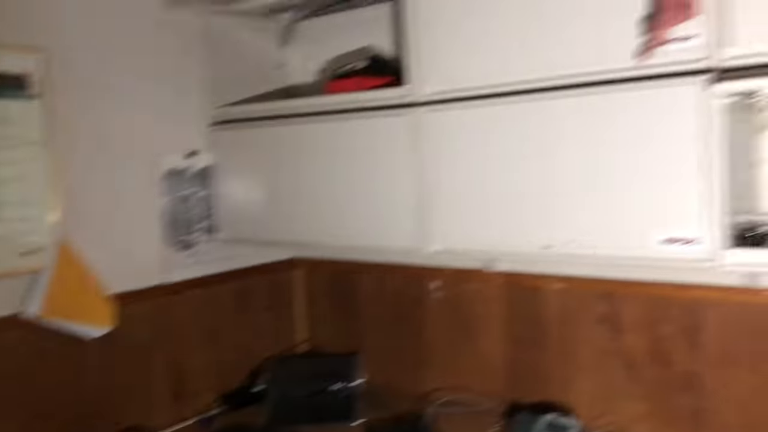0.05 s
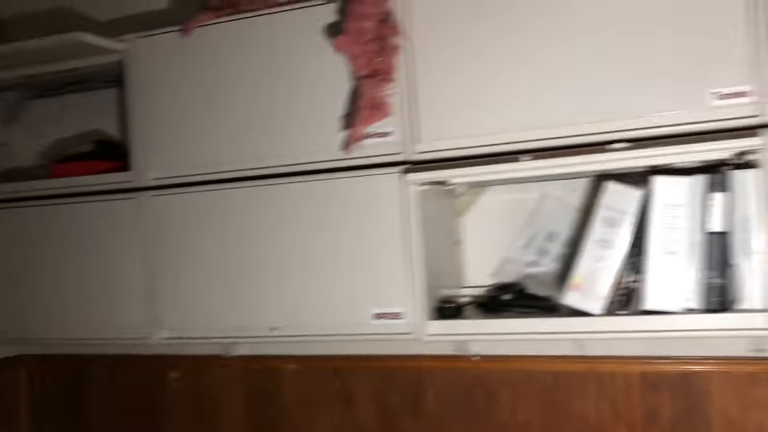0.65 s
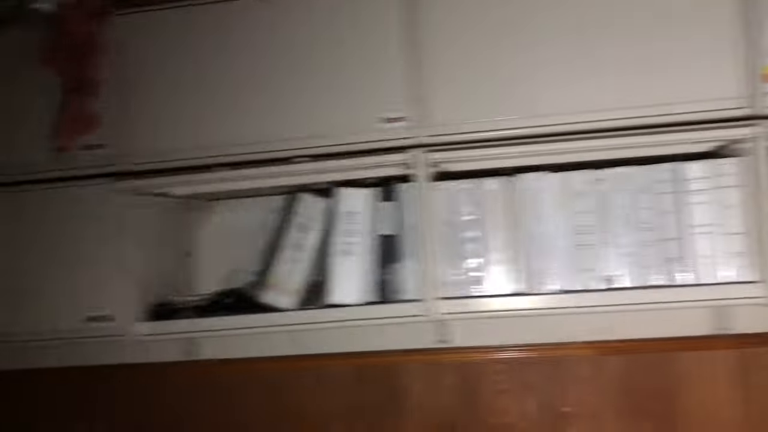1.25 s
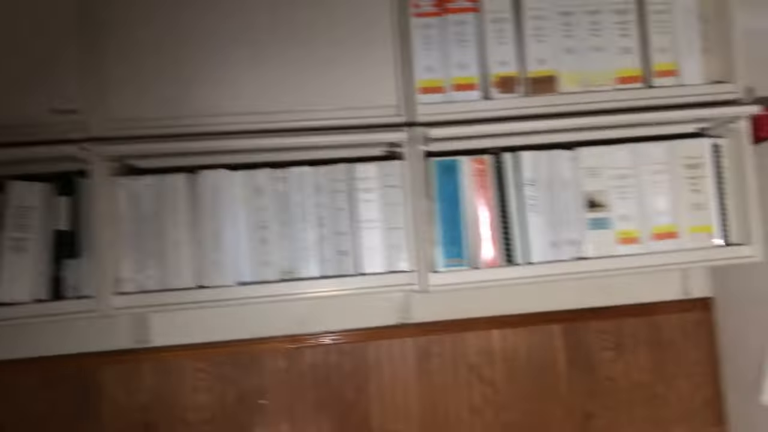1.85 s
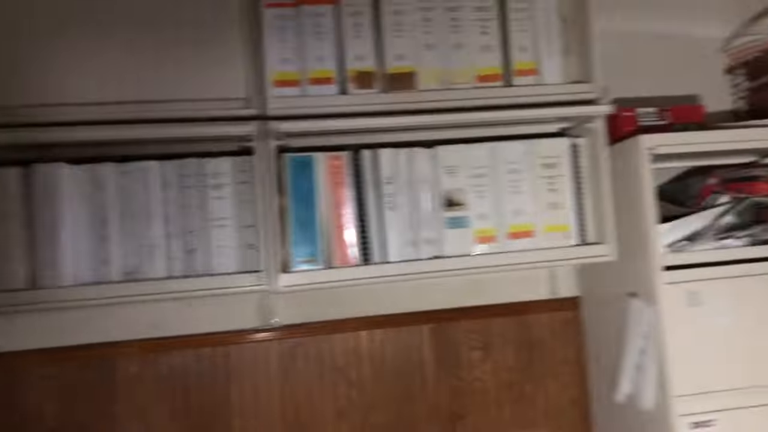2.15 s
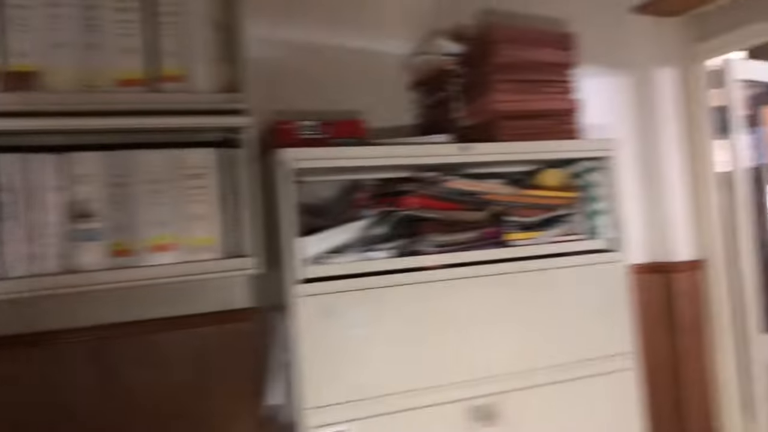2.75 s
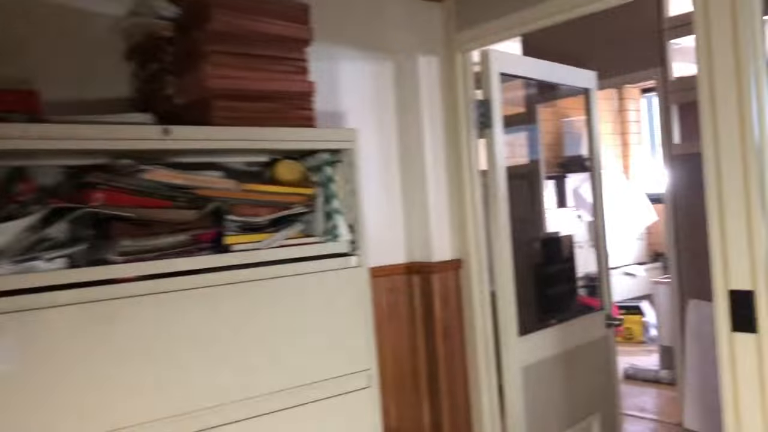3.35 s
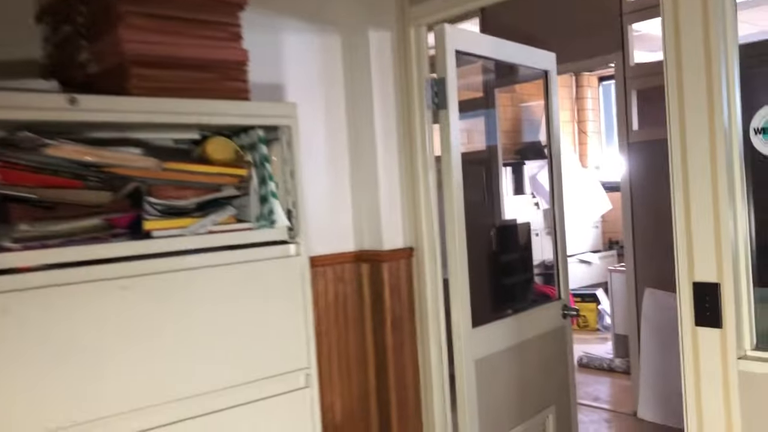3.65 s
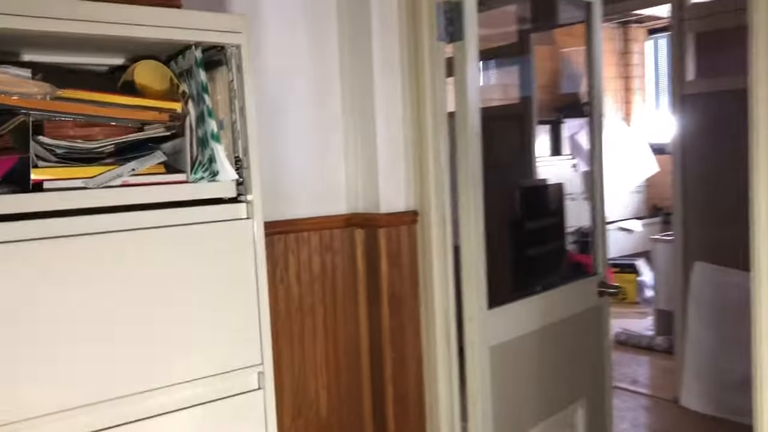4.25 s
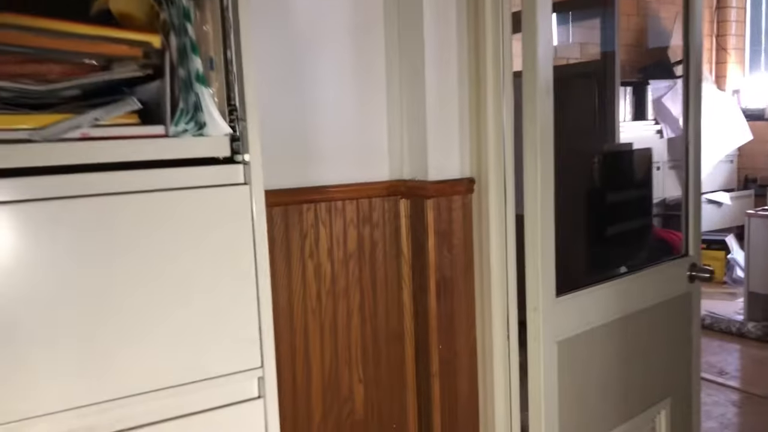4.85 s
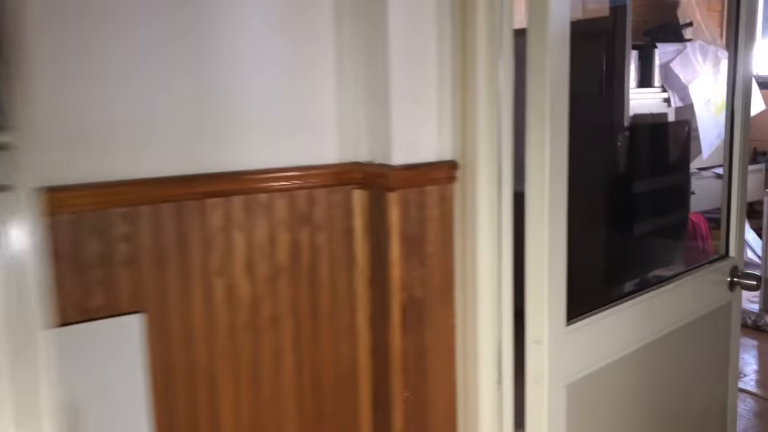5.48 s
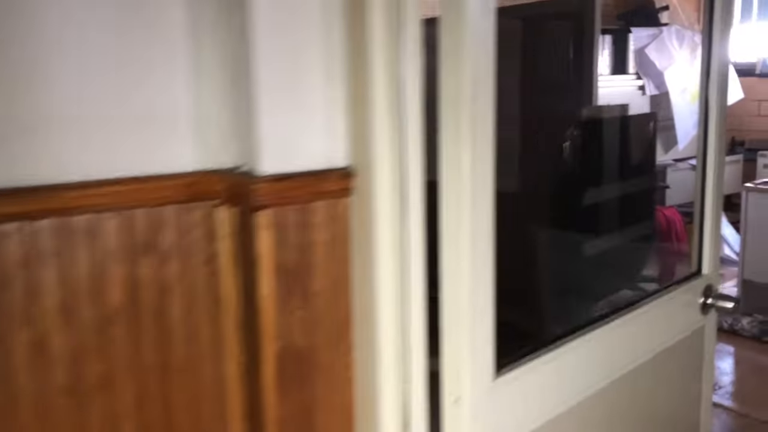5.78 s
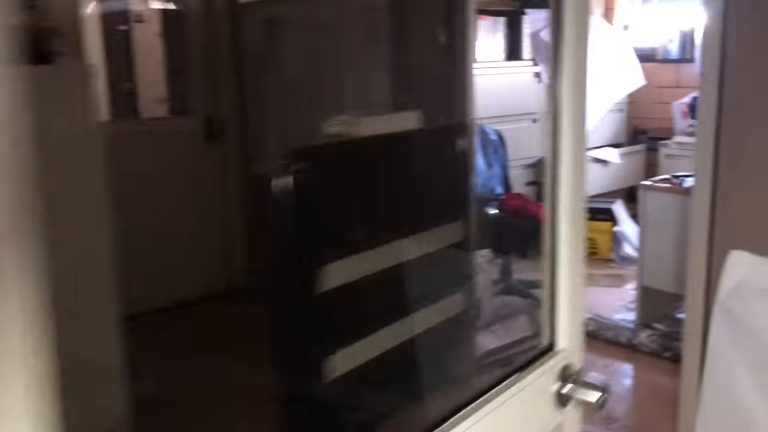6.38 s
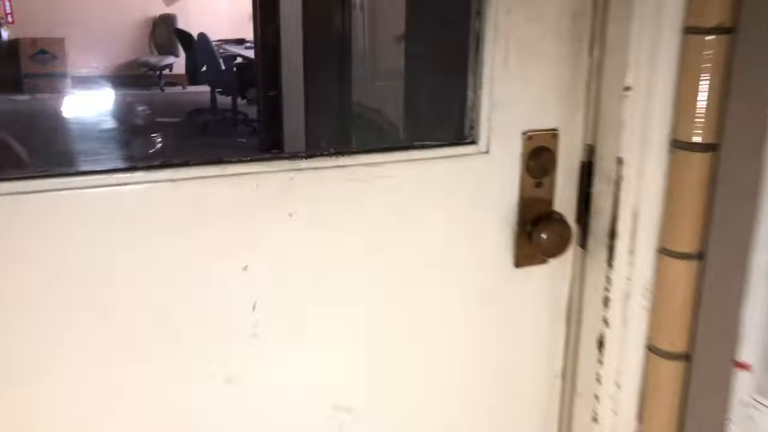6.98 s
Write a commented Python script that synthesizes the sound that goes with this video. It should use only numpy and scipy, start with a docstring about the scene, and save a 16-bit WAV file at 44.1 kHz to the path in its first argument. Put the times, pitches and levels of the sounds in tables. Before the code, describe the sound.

Faint footsteps on wooden boards lead into a loud knock and the brief clatter of a metal sheet. The walker carries on unevenly, scraping over grit and snapping small bits of debris, with a cluster of heavy steps, one more firm thud and then lighter knocks. The quiet, furnished office echoes briefly, while soft cloth rustle and hand rumble sit right at the microphone.

```python
"""A cluttered office: someone walks slowly through it, phone in hand. Shoes knock the floorboards into
shaking and scuff over grit. A loose metal sheet clanks and rocks to rest, brittle litter snaps underfoot,
and soles and small fittings squeak as they rub. All this echoes briefly in the furnished room.
Close to the microphone, clothes rustle and the hand rumbles on the phone; the building is very quiet."""
import sys
import numpy as np
from scipy import signal
from scipy.fft import rfft, irfft
from scipy.io import wavfile
from scipy.ndimage import uniform_filter1d

SR = 44100
rng = np.random.default_rng(int(sys.argv[2]) if len(sys.argv) > 2 else 0)


def store_wav(level_fs):
    """Save 16-bit WAV to argv[1]."""
    pcm = np.round(np.clip(np.atleast_2d(level_fs), -1, 1) * 32767)
    wavfile.write(sys.argv[1], SR, pcm.T.astype(np.int16))


N = 318402
TIME = np.arange(N) / SR
FREQ = np.maximum(np.arange(2049) * SR / 4096, 1)  # every filter curve has one gain for each of these Hz

# The tones at which light, hard litter rings. Each row: pitch in Hz, width in Hz, strength in dB.
LITTER_TONES = [(910, 200, 12), (1380, 74, 10), (1720, 270, 7), (2290, 170, 5.5), (3770, 410, 5),
                (4560, 250, 2), (6800, 220, -11)]


def undb(db):
    """Turn decibels into a number to multiply by."""
    return 10 ** (np.asarray(db) / 20)


def add(out, start, sound):
    """Mix a sound into out, from a start time in seconds."""
    i = int(start * SR)
    out[i:i + len(sound)] += sound[:N - i]


def fade(t, fade_s):
    """A dying away that falls by 60 dB in fade_s seconds, the fade time."""
    return np.exp(-np.log(1000) * t / fade_s)


def wander(per_second, count):
    """A smooth random drift, mostly between -1 and 1."""
    hold = max(int(SR / per_second), 1)
    stairs = np.repeat(rng.standard_normal(count // hold + 1), hold)
    return uniform_filter1d(stairs, hold)[:count]


def grains(count, spread_db):
    """Many tiny contacts of unequal size make a rough noise, scaled to a power of 1."""
    noise = rng.standard_normal(count) * undb(spread_db * wander(2500, count))
    return noise / np.sqrt(np.mean(noise ** 2))


def ring(sound, curve):
    """Filter a sound by the shape of a curve; white noise keeps its power."""
    cepstrum = irfft(np.log(curve / curve.max() + 1e-5))
    half = len(cepstrum) // 2
    # folding onto the first half makes the ringing come after a hit, never before it
    cepstrum[1:half] *= 2
    cepstrum[half + 1:] = 0
    response = irfft(np.exp(rfft(cepstrum)))
    return signal.fftconvolve(sound, response / np.linalg.norm(response))


def band(low_hz, high_hz, slope):
    """A filter curve that passes sound between two edges; more slope means less treble."""
    return 1 / np.sqrt((1 + (low_hz / FREQ) ** 5) * (1 + (FREQ / high_hz) ** (2 * slope)))


def colour(points):
    """A filter curve drawn through (Hz, dB) points."""
    hz, db = np.transpose(points)
    return undb(np.interp(np.log(FREQ), np.log(hz), db))


def body(tones, patchy_db):
    """The filter curve of a struck thing: its main tones, plus ripples that differ from spot to spot."""
    peaks = sum(undb(db) ** 2 / (1 + (2 * (FREQ - hz) / width) ** 2) for hz, width, db in tones)
    ripples = np.interp(np.sqrt(FREQ), np.linspace(0, np.sqrt(SR / 2), 130), rng.standard_normal(130))
    return np.sqrt(1 + peaks) * undb(patchy_db * ripples * np.minimum(FREQ / 700, 1))


def building():
    """The air of the empty building makes a faint, steady noise."""
    # The tone of the air. Each row: frequency in Hz, relative level in dB.
    air_tone = [(18, -28), (30, -19), (55, -8), (110, -2.5), (230, -6.5), (430, -3.5), (800, -15),
                (2000, -26), (6000, -26), (15500, -27)]
    return undb(-72) * ring(rng.standard_normal(N), colour(air_tone))[:N]


def room(sound, echo_db):
    """Cabinets and walls scatter a sound, adding a short echo to it."""
    # How long the echo lasts. Each row: frequency in Hz, fade time in seconds.
    echo_times = [(125, 0.29), (500, 0.22), (2000, 0.33), (6000, 0.25), (14000, 0.28)]
    hz, fade_times = np.transpose(echo_times)
    t = TIME[:SR * 3 // 4]
    octave = np.log2(np.maximum(np.linspace(0, SR / 2, len(t) // 2 + 1), 1))
    scatter = rfft(rng.standard_normal(len(t)))
    echo = np.zeros(len(t))
    for one_band, fade_s in zip(np.eye(len(hz)), fade_times):
        share = np.interp(octave, np.log2(hz), one_band)
        echo += irfft(scatter * share, len(t)) * fade(t, fade_s)
    echo *= np.clip((t - 0.004) / 0.004, 0, 1)  # the first bounce takes 4 ms to arrive
    return sound + undb(echo_db) * signal.fftconvolve(sound, echo / np.linalg.norm(echo))[:N]


def clothes_and_hand():
    """Cloth folds and rubs in small uneven surges; the hand rumbles on the phone as the body moves."""
    # The walker's movement. Each row: time in seconds, then base levels in dB of rustle, hiss and rumble.
    movement = [(0.0, -72, -83, -80.5), (1.03, -73, -80.5, -78.5), (1.24, -66, -76.5, -69),
                (1.81, -59, -71, -78), (1.97, -49.5, -53.5, -75), (2.15, -53, -61.5, -73),
                (2.33, -69.5, -73.5, -76), (3.08, -59, -69, -73.5), (3.76, -59.5, -70.5, -79),
                (4.0, -59, -63, -74), (4.32, -60.5, -72.5, -77), (4.66, -62, -67, -74),
                (4.93, -55, -65, -70), (5.13, -61.5, -69.5, -68.5), (5.45, -68.5, -71, -72),
                (5.89, -56.5, -64.5, -68), (6.86, -67, -72.5, -70), (7.22, -56, -64.5, -67.5)]
    # The tones of cloth rustle, cloth hiss and hand rumble. Each row: frequency in Hz, relative dB.
    rustle_tone = [(60, -33.5), (130, 2.5), (300, 2), (550, -3), (1000, -7.5), (2000, -15), (4000, -40),
                   (12000, -34.5)]
    hiss_tone = [(500, -6), (1500, 6), (3500, 4), (7000, -2), (15000, -10)]
    rumble_tone = [(18, -18), (35, -3.5), (52, 1.5), (90, -1.5), (150, -14.5), (400, -42.5)]
    times, *levels = np.transpose(movement)
    rustle_db, hiss_db, rumble_db = (np.interp(TIME, times, level) for level in levels)
    folds = wander(28, N)
    rustle = ring(grains(N, spread_db=4) * undb(rustle_db + 1.4 * folds), colour(rustle_tone))
    hiss = ring(grains(N, spread_db=2) * undb(hiss_db + 0.42 * folds + 2), colour(hiss_tone))
    rumble = ring(rng.standard_normal(N) * undb(rumble_db + 3), colour(rumble_tone))
    return (rustle + hiss + rumble)[:N]


def squeaks():
    """A brief rub wakes one thin, high tone and a weaker one above it."""
    # Soles and small fittings rubbing. Each row: start in seconds, level in dB, pitch in Hz, width in Hz.
    rubs = [(2.479, -49, 1800, 350), (3.272, -48.5, 8070, 130), (4.156, -62, 10900, 900),
            (4.976, -65, 8300, 150), (5.874, -67, 11000, 700), (6.574, -55, 10700, 900)]
    out, count = np.zeros(N), int(0.052 * SR)
    swell = np.interp(np.linspace(0, 1, count), [0, 0.08, 1], [0, 1, 0.1])
    for start, db, hz, width_hz in rubs:
        rub = rng.standard_normal(count) * swell
        tone, overtone = (1 / (1 + (2 * (FREQ - centre) / width_hz) ** 2) for centre in (hz, hz * 1.92))
        add(out, start, undb(db) * ring(rub, tone + undb(-4.5) * overtone))
    return out


def snaps():
    """Brittle bits break with one sharp crack that rings the litter around them."""
    # Bits breaking underfoot. Each row: start in seconds, level in dB, pitch in Hz.
    breaks = [(1.931, -44, 1950), (1.951, -39.5, 1490), (1.984, -42.5, 4000), (2.020, -37.5, 3100),
              (2.040, -43, 3900), (3.126, -31, 2170), (4.577, -44, 1950), (4.926, -49.5, 4050),
              (5.014, -44.5, 2410), (6.084, -61, 2670)]
    out, t = np.zeros(N), TIME[:SR // 10]
    for start, db, hz in breaks:
        crack = rng.standard_normal(len(t)) * fade(t, fade_s=0.029)
        crack[0] += 10  # the break itself is a single spike
        curve = band(hz / 1.8, hz * 1.8, slope=2.6) * body(LITTER_TONES, patchy_db=6)
        add(out, start, undb(db) * ring(crack, curve))
    return out


def clanks():
    """The metal sheet rings with the same tones at each blow; where it is hit sets their balance."""
    # Blows on the sheet. Each row: start in seconds, level in dB, bass change in dB,
    # treble change in dB, seconds until it touches down again.
    blows = [(1.7835, -26.5, -22, -6, 0.092), (1.7932, -25.5, 1.5, 3, 0.091),
             (1.8115, -31.5, -5.5, -23, 0.052), (2.041, -45, 11, -25, 0.069),
             (2.113, -33.5, -13, -12, 0.055), (2.232, -40.5, -21, -11.5, 0.072)]
    # The sheet's own tones. Each row: pitch in Hz, relative level in dB, fade time in seconds.
    sheet_tones = [(173, -8.5, 0.28), (202, -13.5, 0.2), (259.5, -6, 0.56), (315, -10.5, 0.29),
                   (343.5, -13.5, 0.37), (392, -20, 0.46), (459, -18.5, 0.65), (508, -11.5, 0.22),
                   (555, -6, 0.074), (683, -24, 0.26), (722, -2, 0.27), (800, -16.5, 0.25),
                   (923, -10.5, 0.2), (1330, -20, 0.17), (1306, -16, 0.19), (1660, -12, 0.12),
                   (1727, -7.5, 0.11), (1750, -19, 0.11), (1792, -8.5, 0.11), (2300, -3.5, 0.042),
                   (2373, -6.5, 0.042), (2630, -11, 0.071), (2940, -22, 0.18)]
    out, t = np.zeros(N), TIME[:SR]
    hz, tone_db, fade_times = np.transpose(sheet_tones)
    direction = (-1.0) ** np.arange(len(hz))  # neighbouring tones push the air opposite ways
    choke_db = np.interp(hz, [350, 685, 780, 920], [-0.5, -7, -17, 1])  # landing mutes the middle tones
    for start, db, bass_db, treble_db, free_s in blows:
        bent_time = np.cumsum(1 + 0.007 * wander(45, len(t))) / SR  # the shifting support bends the pitch
        tones = np.sin(2 * np.pi * hz[:, None] * bent_time) * fade(t, fade_times[:, None])
        landed = np.clip((t - free_s) / 0.0065, 0, 1)
        tones *= undb(np.outer(choke_db, landed))
        balance_db = np.interp(hz, [400, 724, 950, 1710], [bass_db, 0, 0, treble_db])
        strengths = direction * undb(db + tone_db + balance_db)
        chatter = undb(2.1 * wander(157, len(t)))  # the loose sheet buzzes against the floor
        add(out, start, (strengths @ tones) * chatter)
    return out


def slide(length_s, peak_at, low_hz, db_per_octave):
    """A sole catches and slips on grit: a grainy swell that ends as the foot stops."""
    count = int(length_s * SR)
    pressure = np.interp(np.linspace(0, 1, count), [0, peak_at, 1], [0, 1, 0]) ** 0.64
    slips = grains(count, spread_db=1) * undb(2.04 * wander(127, count))
    tilt = undb(db_per_octave * np.log2(np.maximum(FREQ / low_hz, 1)))
    curve = band(low_hz, SR, slope=1.6) * tilt * body([], patchy_db=3)
    return ring(slips * pressure, curve)


def treads():
    """Weight settles on the boards in a short, dull swell."""
    # Soft steps. Each row: start in seconds, level in dB, low edge of the sound in Hz.
    soft_steps = [(1.152, -51.5, 84), (1.262, -52, 90), (1.430, -57.5, 80), (2.28, -51.5, 344),
                  (2.488, -58.5, 205), (3.299, -53, 131), (5.735, -49.5, 200)]
    out = np.zeros(N)
    for start, db, low_hz in soft_steps:
        add(out, start, undb(db) * slide(length_s=0.073, peak_at=0.4, low_hz=low_hz, db_per_octave=-12.5))
    return out


def scuffs():
    """Soles slide over the floor: a quick scrape bites at once, a long drag builds up."""
    # Sliding soles. Each row: start in seconds, length in seconds, level in dB, low edge in Hz,
    # treble tilt in dB per octave.
    drags = [(0.698, .27, -71, 1000, -9), (0.914, .052, -63, 1090, -10), (1.201, .16, -68.5, 1200, -7.5),
             (1.875, 0.067, -36.5, 500, -0.5), (2.028, 0.035, -47.5, 2480, -2),
             (2.456, 0.11, -50, 1210, -8.5), (2.61, .1, -57, 1710, -6), (3.123, 0.058, -47, 700, -5.5),
             (3.896, 0.036, -37, 1500, 0), (3.91, 0.043, -33, 3020, -1), (4.499, 0.23, -55.5, 590, -4),
             (4.928, 0.2, -44.5, 318, -5.5), (6.145, 0.088, -44, 850, -3.5),
             (6.981, 0.037, -50, 2350, -3.5)]
    # When a slide presses hardest. Each row: length in seconds, place of the peak from 0 (start) to 1 (end).
    peak_places = [(.05, 0.17), (.09, 0.11), (.12, 0.4), (.19, .7), (.26, 0.26)]
    out = np.zeros(N)
    for start, length_s, db, low_hz, db_per_octave in drags:
        peak_at = np.interp(length_s, *np.transpose(peak_places))
        add(out, start, undb(db) * slide(length_s, peak_at, low_hz, db_per_octave))
    return out


def shake(t, fade_s):
    """One push, and the rattle that it leaves."""
    rattle = 1.096 * rng.choice([-1.0, 1.0], len(t)) * fade(t, fade_s)
    rattle[0] += 8  # the push
    return rattle


def knocks():
    """A blow shakes the boards and crushes grit; a heavy one also brings out a thump of the whole floor."""
    # Heels, soles and bumped clutter. Each row: start in seconds, level in dB, pitch in Hz,
    # fade time of the shaking in seconds, grit level in dB relative to the blow.
    blows = [ (0.541, -61.5, 454, 0.24, -22), (1.708, -50, 332, 0.091, -27), (1.783, -31.5, 640, 0.24, -10),
             (1.792, -27, 794, .12, -14.5), (1.918, -34, 1090, 0.12, -15.5), (2.041, -39, 398, 0.071, -12),
             (2.702, -47.5, 263, 0.24, -36), (2.925, -55, 437, 0.24, -18), (3.096, -47.5, 970, 0.37, -15),
             (3.126, -38.5, 1100, .06, -22), (3.736, -53.5, 368, .2, -14), (3.783, -49.5, 670, 0.026, -26),
             (3.859, -31, 424, 0.35, -15), (3.901, -31, 610, 0.11, -18), (3.917, -27.5, 430, .15, -10),
             (3.931, -33, 258, 0.13, -10), (3.990, -40.5, 487, 0.14, -22.5), (4.161, -47, 770, 0.13, -32),
             (4.351, -53, 800, 0.16, -29), (4.773, -41.5, 450, 0.08, -14.5), (4.812, -49, 250, 0.091, -11),
             (4.836, -47, 760, 0.077, -10.5), (4.889, -42.5, 290, 0.12, -24), (4.924, -43, 169, .07, -16),
             (5.252, -56, 170, 0.097, -9), (5.278, -27, 360, .1, -19.5), (5.607, -44.5, 198, 0.073, -28),
             (5.867, -49.5, 480, .08, -7), (5.992, -44, 378, 0.096, -14), (6.145, -47, 563, .08, -6),
             (6.201, -45, 380, 0.099, -14), (6.420, -43.5, 288, .07, -20), (6.900, -51, 340, 0.092, -11),
             (7.028, -46, 473, 0.047, -5.5)]
    # The tones of the floor and its cabinets. Each row: pitch in Hz, width in Hz, strength in dB.
    floor_tones = [(135, 78, 6), (182, 21, 11.5), (332, 58, 5), (568, 120, 3.5), (734, 39, 2.5),
                   (870, 24, 0), (1255, 43, 3.5), (1502, 45, 3.5), (1830, 34, 3), (2310, 49, -21)]
    heavy_db, thump_delay_s = -28, 0.00427
    out, t = np.zeros(N), TIME[:SR // 3]
    for start, db, hz, fade_s, grit_db in blows:
        pitch_band = band(hz / 1.85, hz * 1.85, slope=2.09)
        boards = ring(shake(t, fade_s), pitch_band * body(floor_tones, patchy_db=3.5))
        crush = grains(len(t), spread_db=2) * fade(t, fade_s * 1.75)
        grit = ring(crush, band(1110, 5000, slope=0.77) * body(LITTER_TONES, patchy_db=2))
        add(out, start, undb(db) * (boards + undb(grit_db) * grit))
        thump = ring(shake(t, fade_s=0.15), band(57.7, 149, slope=2.25))
        thump_db = db - 13.5 + 0.72 * (db - heavy_db)  # the thump grows faster than the blow
        add(out, start + thump_delay_s, undb(thump_db) * thump)
    return out


def scene():
    """Everything on the floor echoes in the room; the clothes and hand are right at the phone."""
    steps = room(knocks() + scuffs() + treads() + squeaks(), echo_db=-10.5)
    litter = room(snaps(), echo_db=-9)
    metal = room(clanks(), echo_db=-11)
    return (steps + litter + metal + clothes_and_hand() + building())[None]


def record(dry):
    """The microphone loses the deepest bass, the level dips briefly, and the highest treble is cut."""
    # The brief dip in level. Each row: time in seconds, level change in dB.
    dip_points = [(6.912, 0), (6.925, -18), (6.935, -16), (6.955, 0)]
    dip = undb(np.interp(TIME, *np.transpose(dip_points)))
    bass_cut = signal.butter(2, 34, "high", fs=SR, output="sos")
    treble_cut = signal.ellip(10, 0.2, 60, 15900, fs=SR, output="sos")
    return signal.sosfilt(treble_cut, signal.sosfilt(bass_cut, dry) * dip)


dry = scene()
out = record(dry)
store_wav(out)
```